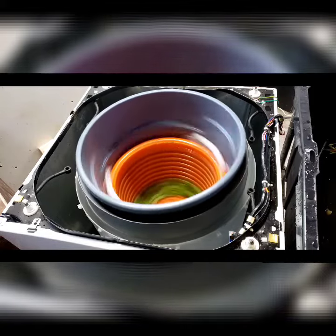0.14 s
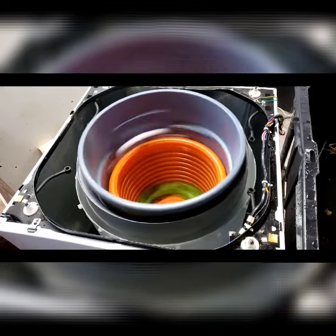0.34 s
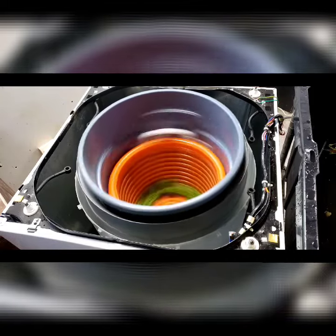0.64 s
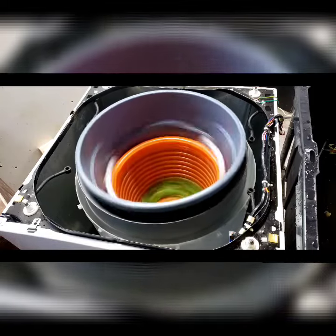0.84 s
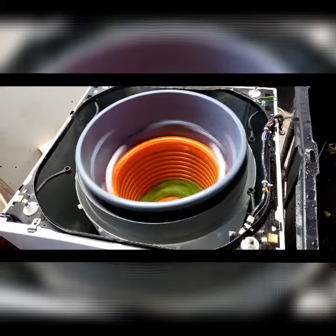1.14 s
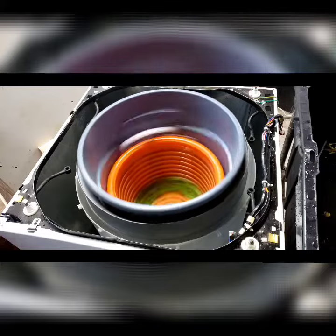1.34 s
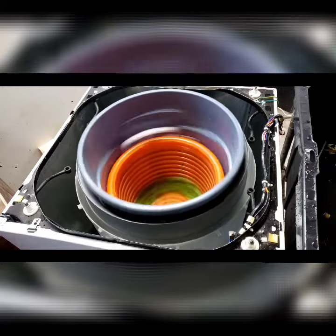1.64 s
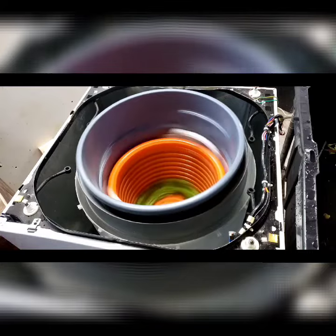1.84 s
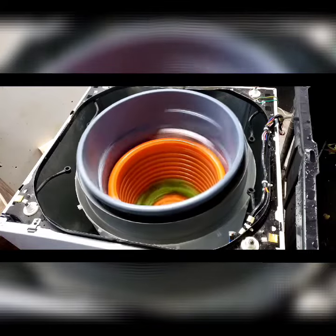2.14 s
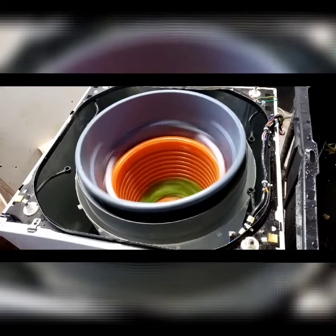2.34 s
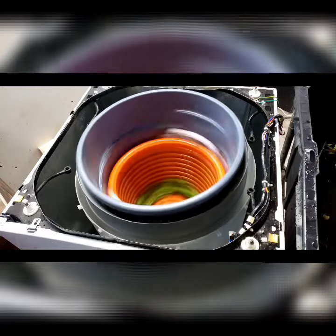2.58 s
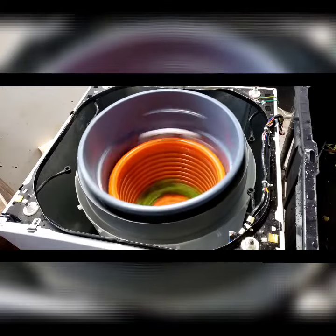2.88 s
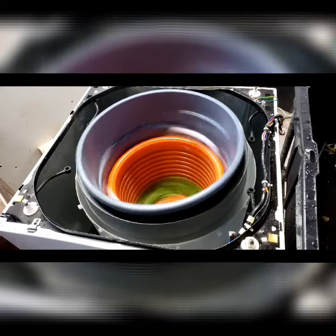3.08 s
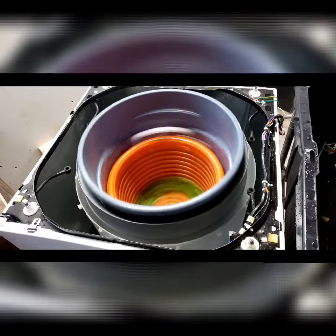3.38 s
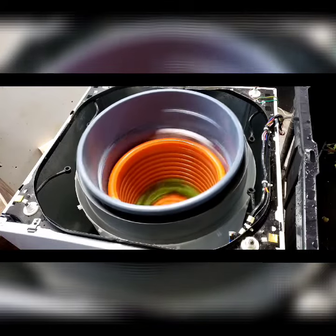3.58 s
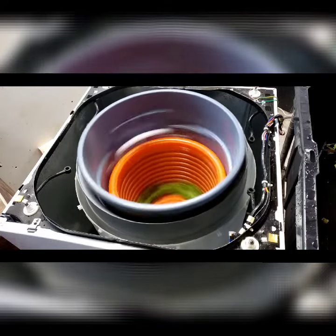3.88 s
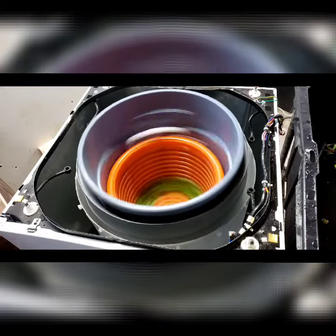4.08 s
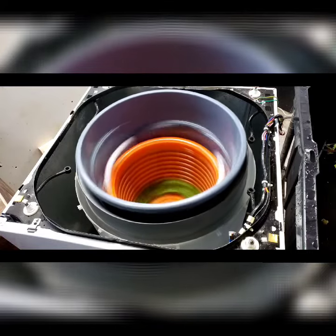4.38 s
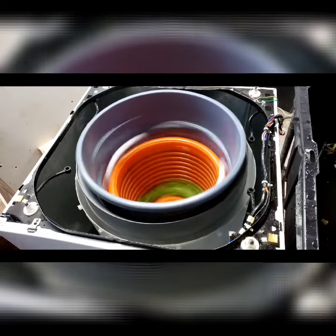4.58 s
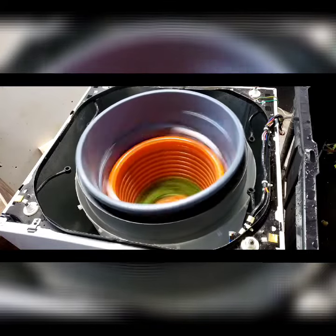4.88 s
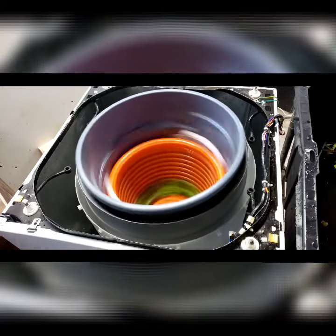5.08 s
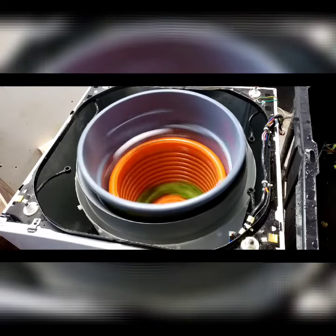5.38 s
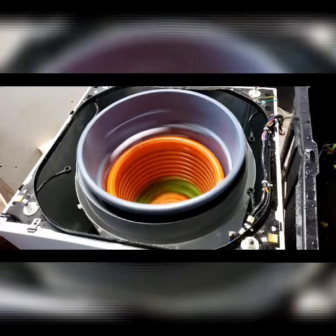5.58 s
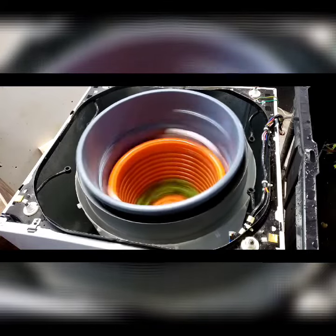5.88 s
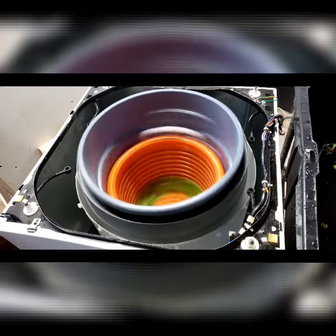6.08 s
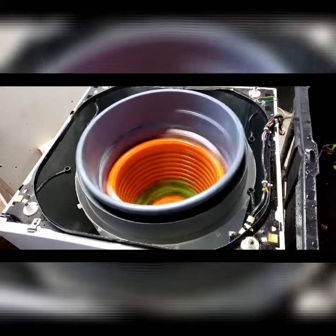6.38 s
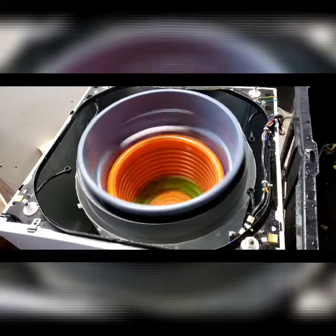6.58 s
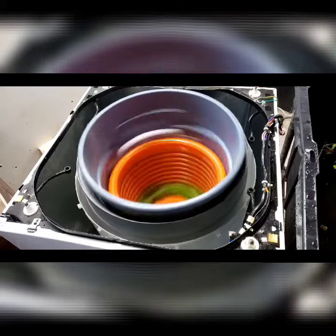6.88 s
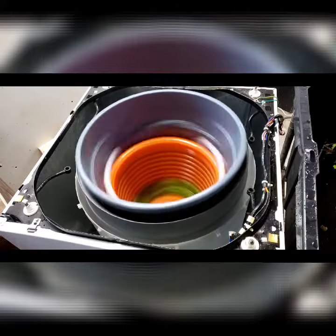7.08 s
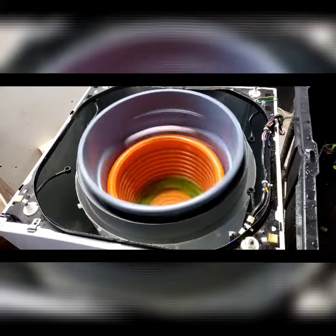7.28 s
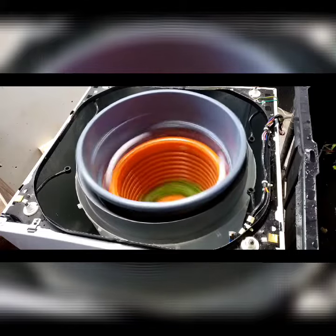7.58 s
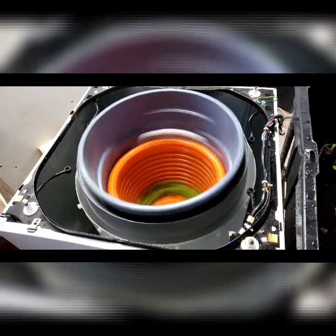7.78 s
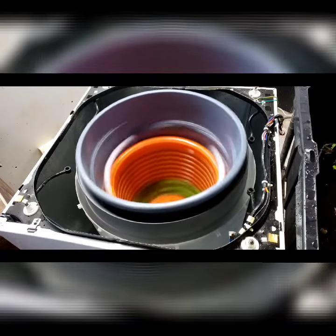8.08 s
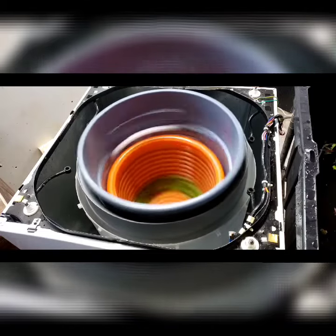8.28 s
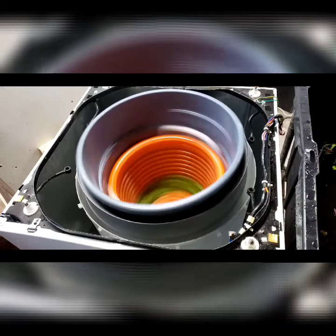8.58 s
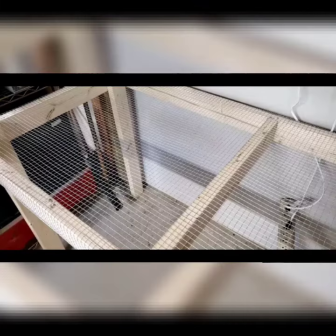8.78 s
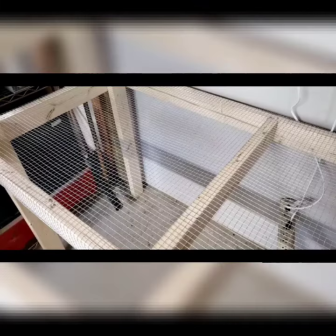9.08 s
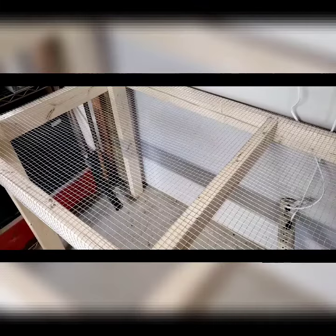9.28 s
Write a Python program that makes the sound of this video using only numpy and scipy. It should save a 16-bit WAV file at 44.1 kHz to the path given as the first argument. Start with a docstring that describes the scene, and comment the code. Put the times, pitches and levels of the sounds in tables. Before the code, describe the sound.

From 0 s a steel washer drum is already spinning fast in its open cabinet, very close to a phone microphone. A loud, low hum near 80 Hz dominates, fluttering several times a second and climbing smoothly, swelling as it passes through the cabinet's boom above 100 Hz. Beneath it, rough bearings rumble and rattle the panels in a partly repeating pattern; thin shaft tones swell and fade, and a whirr with rushing air fills the top, fullest around 2 s. At about 5.6 s the acceleration freshens. Dull, soft thumps strike from 5.9 to 6.4 s, with a falling-pitch knock and a momentary hum dip near 6.35 s, then another thump at 6.9 s. The pitch reaches roughly 130 Hz. At 8.78 s everything cuts off. After a tiny silence, quiet low room tone returns at 8.85 s with faint grainy rustles, a bright tick near 9.14 s, and dull taps around 9.37 s.

```python
"""A belt-driven steel washer drum spins up in its open cabinet, close to a phone microphone. Motor unbalance and
drum wobble sweep through the cabinet's boom, rough bearings rattle the panels with a pattern that partly repeats
each drum turn, shaft tones swell as they cross panel modes, and filtered noise makes the whirr and rushing air.
Dull thumps shake the panels. The sound cuts off; after a short silence come a quiet room with low noise,
grainy soft rustles, and a few ticks and taps made of damped rings."""
import sys
import numpy as np
from scipy import signal
from scipy.fft import rfft, irfft
from scipy.io import wavfile
from scipy.ndimage import uniform_filter1d, map_coordinates

SR = 44100
rng = np.random.default_rng(int(sys.argv[2]) if len(sys.argv) > 2 else 0)


def to_wav(sig):
    """Store sig (one row per channel, or 1-D mono) as 16-bit WAV at the path in sys.argv[1].

    Samples outside -1..1 are clipped; the rate is SR.
    """
    pcm = np.clip(np.atleast_2d(sig), -1, 1) * 32767
    pcm = np.round(pcm).astype(np.int16)
    wavfile.write(sys.argv[1], SR, pcm.T)  # frames by channels


N = 416304
T = np.arange(N) / SR
PULLEY_RATIO = 13.019  # motor turns per drum turn


def undb(db):
    """Amplitude gain of a level in dB."""
    return np.exp(np.asarray(db) * np.log(10) / 20)


def unit(x):
    """Signal scaled to rms 1."""
    return x / np.sqrt(np.mean(x ** 2))


def noise():
    """White noise over the whole scene."""
    return rng.standard_normal(N)


def curves(table):
    """Columns of a time table, drawn as straight lines between its rows."""
    s, *columns = np.transpose(table)
    return [np.interp(T, s, column) for column in columns]


def ring(x, hz, width_hz):
    """One resonance, gain 1 at its centre."""
    return signal.lfilter(*signal.iirpeak(hz, hz / width_hz, SR), x)


def walk(rate_hz):
    """Random levels, each held for 1 / rate_hz and smoothed twice; rms 1."""
    hold = int(SR / rate_hz)
    held = np.repeat(rng.standard_normal(N // hold + 1), hold)
    smooth = uniform_filter1d(uniform_filter1d(held, hold), hold)
    return unit(smooth[:N])


def hiss(spectrum, flicker_db, rate_hz):
    """Noise of a given spectrum in half-octave bands that flicker independently; rms 1."""
    table_hz, table_db = np.transpose(spectrum)
    f = np.maximum(np.arange(N // 2 + 1) * SR / N, 1)
    level_db = np.interp(np.log(f), np.log(table_hz), table_db, left=-90, right=-90)
    shaped = rfft(noise()) * undb(level_db)
    band = np.round(2 * np.log2(f))
    first, last = np.round(2 * np.log2(table_hz[[0, -1]]))
    out = np.zeros(N)
    for b in np.arange(first, last + 1):
        out += irfft(shaped * (band == b), N) * undb(flicker_db * walk(rate_hz))
    return unit(out)


def knocks(hits, modes, noisy):
    """Short damped rings, each a sine mixed with a noisy share."""
    t = T[:SR // 4]
    out = np.zeros(N + len(t))
    for s, hit_db in hits:
        start = int(s * SR)
        for hz, db, t60 in modes:
            rough = unit(ring(rng.standard_normal(len(t)), hz, hz / 2))
            body = (1 - noisy) * np.sin(2 * np.pi * hz * t) + noisy * rough / 2
            out[start:start + len(t)] += undb(hit_db + db) * body * undb(-60 * t / t60)
    return out[:N]


START_HZ = 80.543  # motor shaft speed at the start
# Drive stages, each adding speed that levels off: start_s, gain_hz, time_constant_s
DRIVE_STAGES = [(0, 37.743, 9.3406), (5.5733, 64.496, 8.0228)]
# Levels through the spin: time_s, rumble_db, air_db
SPIN_LEVELS = [(0, -42.5, -48), (.9, -43, -47), (2, -40, -43.5), (3.8, -41.5, -45.5), (5.9, -40.5, -46),
               (6.6, -42, -46.5), (7.5, -42, -48), (8.76, -40, -47.5)]


def washer():
    """The shaft spins up in stages; each part of the machine follows its speed, angle or level."""
    hz = START_HZ + sum(gain * (1 - np.exp(-np.maximum(T - s, 0) / tau)) for s, gain, tau in DRIVE_STAGES)
    turns = np.cumsum(hz) / SR
    rumble_db, air_db = curves(SPIN_LEVELS)
    load = np.cos(2 * np.pi * (turns / PULLEY_RATIO + 0.02))  # bearing load swings once a drum turn
    bearings = rumble(turns, rumble_db + 0.71 * load + 0.69 * walk(1.27))
    shaft_tones = undb(2.1 * load) * tones(hz, turns)
    return undb(0.3) * hum(hz, turns) + bearings + shaft_tones + whirr(hz, air_db) + air(air_db) + thumps()


# Motor unbalance swung by belt tension, force at a 100 Hz shaft: offset_drum_rates, force_db, lead_cycles
UNBALANCE_LINES = [(-2, -41.8, -.23), (-1, -38, -.34), (0, -19.2, .44), (1, -35.1, -.43), (2, -37.7, -.05),
                   (3, -47.9, .12), (6, -41.9, -.34)]
# Drum wobble, force at a 100 Hz shaft: drum_rate_multiple, force_db, lead_cycles
WOBBLE_LINES = [(11, -38.3, .29), (12, -32, .37), (14, -33.5, -.01), (15, -35.9, .42), (16, -39.5, -.2),
                (17, -44.3, .35), (18, -52.4, .38), (19, -44.5, .21), (21, -47, .1)]
# Low cabinet modes, negative gain where the panel swings the other way: pitch_hz, width_hz, gain
CABINET_MODES = [(110.8, 13.27, 1.23), (119.46, 10.73, -1.03), (96.37, 6.64, -.11), (133.5, 5.5, .5)]
# One brief dip in the hum: start_s, end_s, level_db
HUM_LEVEL_DIP = (6.364, 6.401, -16)


def hum(hz, turns):
    """Out-of-balance forces grow with speed and sweep through the low cabinet modes."""
    drum = turns / PULLEY_RATIO
    shaft = sum(undb(db) * np.cos(2 * np.pi * (turns + k * drum + lead)) for k, db, lead in UNBALANCE_LINES)
    wobble = sum(undb(db) * np.cos(2 * np.pi * (k * drum + lead)) for k, db, lead in WOBBLE_LINES)
    force = shaft * (hz / 100) ** 2 + wobble * (hz / 100) ** 3.5
    start, end, dip_db = HUM_LEVEL_DIP
    inside = (T > start) & (T < end)
    dip = uniform_filter1d(np.where(inside, undb(dip_db), 1.), 200)
    return dip * sum(gain * ring(force, f, width) for f, width, gain in CABINET_MODES)


# Panel modes rung by bearings and thumps, relative levels: pitch_hz, width_hz, level_db
PANEL_MODES = [(73, 55, -1), (144.3, 37, -0.5), (230.7, 31, -5), (250, 19.2, -6), (286.4, 28, -8),
               (369, 95, -5.5), (439.6, 22.3, -4), (502.4, 24, -6), (549, 42, -10), (729, 18.4, -16.5),
               (892, 56, -16.5)]


def rumble(turns, level_db, repeat=0.59, memory_turns=5.92):
    """Rough bearings ring the panels; a share of the roughness repeats round the drum and slowly changes."""
    drum, size = turns / PULLEY_RATIO, 8192
    patterns = rng.standard_normal((60, size))
    patterns = np.hstack([patterns, patterns[:, :1]])  # close each pattern into a loop
    age = drum / memory_turns  # one new pattern every memory_turns drum turns
    fade = np.sqrt((age % 1) ** 2 + (1 - age % 1) ** 2)  # evens the power of the crossfade
    pattern = map_coordinates(patterns, [age, drum % 1 * size], order=1) / fade
    force = np.sqrt(repeat) * pattern + np.sqrt(1 - repeat) * noise()
    rough = np.zeros(N)
    for k, (f, width, db) in enumerate(PANEL_MODES):
        gain = (-1) ** k * undb(db + 1.33 * walk(7)) / np.sqrt(width)
        rough += gain * ring(force, f, width)
    # the cabinet is too small for deep bass
    rough = signal.sosfilt(signal.butter(2, 62, "high", fs=SR, output="sos"), rough)
    return undb(level_db) * unit(rough)


# Motor and bearing tones, before the panel gain: shaft_rate_multiple, level_db
SHAFT_TONES = [(.534, -52.5), (1.61, -57), (2.36, -48), (2.6, -53), (3, -51), (3.38, -54), (4.4, -41.5),
               (5, -44), (5.35, -51), (6.05, -54)]
# Second shaft harmonic and drum sidebands, level at OVERTONE_HZ: shaft_rate_multiple, level_db
SHAFT_OVERTONES = [(1.923, -51), (2, -46), (2.077, -44.5)]
OVERTONE_HZ, OVERTONE_DB_PER_HZ = 113, 0.8  # overtones grow with shaft speed
# Sharp panel modes that bring the tones out: pitch_hz, width_hz, level_db
TONE_PANEL_MODES = [(60.5, 10, 0), (136, 14, -4), (228, 12, -1), (246, 9, -2.5), (287, 16, -4),
                    (328, 14, -5), (360, 9, -7), (412, 14, -8), (432, 18, -4), (448, 20, 0.5),
                    (490, 30, -14), (520, 24, -10), (735, 20, 0)]
TONE_WANDER_CYCLES = 0.045  # rms stray of a tone's phase


def panel_gain(hz):
    """Combined strength of the sharp panel modes at a changing pitch."""
    power = sum((undb(db) / (1 + (2 * (hz - mode) / width) ** 2)) ** 2 for mode, width, db in TONE_PANEL_MODES)
    return np.sqrt(power)


def tones(hz, turns):
    """Multiples of the shaft rate swell while they cross a panel mode."""
    def line(multiple, db):
        phase = multiple * turns + rng.random() + TONE_WANDER_CYCLES * walk(8)
        return undb(db + 1.9 * walk(9.5)) * panel_gain(multiple * hz) * np.cos(2 * np.pi * phase)

    plain = sum(line(k, db) for k, db in SHAFT_TONES)
    overtones = sum(line(k, db) for k, db in SHAFT_OVERTONES)
    return plain + undb(OVERTONE_DB_PER_HZ * (hz - OVERTONE_HZ)) * overtones


# Upper panel modes, relative level at the shaft speed that sings most: pitch_hz, width_hz, level_db, best_shaft_hz
WHIRR_MODES = [(729.3, 13, -8.5, 133), (1108, 50, -14, 67), (1296, 28, -14.5, 114), (1434, 20, -13.5, 95),
               (1737, 24, -13, 92), (2043, 44, -13.5, 92), (2448, 33, -17, 90), (2550, 23, -17.5, 73),
               (2636, 40, -13, 80), (2760, 32, -14, 78), (3057, 30, -18, 81), (3784, 32, -15.5, 96),
               (3875, 36, -17, 72), (4700, 70, -20, 120)]
WHIRR_DB, WHIRR_DB_PER_HZ = -2, 0.13  # offset from the air level; fall away from the best shaft speed


def whirr(hz, air_db):
    """Upper panel modes whirr along with the air, each strongest near its own shaft speed."""
    out = np.zeros(N)
    for f, width, db, best_hz in WHIRR_MODES:
        level_db = db - WHIRR_DB_PER_HZ * np.abs(hz - best_hz) + 2.27 * walk(6)
        out += undb(level_db) * unit(ring(noise(), f, width))
    return undb(air_db + WHIRR_DB + 1.0 * walk(2.78)) * out


# Spectrum of the air rush, relative density: pitch_hz, level_db_per_hz
AIR_SPECTRUM = [(350, -39), (600, -3.5), (723, -6), (957, -7.5), (1410, -7.5), (2240, -9), (2700, -10.5),
                (3350, -12.5), (3770, -9.5), (8740, -14), (11600, -10.5), (14500, -13)]
RIM_DB = -10  # rim hiss relative to the air level


def air(air_db):
    """Air rushing past the rim: flickering broad noise and a thin high hiss."""
    rush = undb(air_db + 0.29 * walk(4.6)) * hiss(AIR_SPECTRUM, flicker_db=0.91, rate_hz=27)
    rim = undb(air_db + RIM_DB) * unit(ring(noise(), 14900, 4000))
    return rush + rim


# Thumps on the cabinet; the rows from 6.339 to 6.42 s are the parts of one knock whose ring falls in pitch.
# push_db is before the panel gain; a ring sags by twice sag_per_s as a share of its pitch each second:
# start_s, push_db, ring_hz, ring_db, sag_per_s
CABINET_THUMPS = [(5.903, -49, 385, -33.5, .3), (6.028, -47, 385, -33, .3), (6.166, -51, 390, -36, .3),
                  (6.288, -54, 385, -38, .3), (6.339, -43, 620, -38, .5), (6.343, -54, 490, -34, 2.4),
                  (6.37, -52, 310, -33, 1.4), (6.42, -54, 255, -35, .3), (6.895, -48, 430, -42, .3)]
THUMP_S, RING_T60_S = 0.02, 0.2  # contact length; time for a ring to fall 60 dB


def thumps():
    """Soft, dull thumps of the drum shake the panels by short noisy pushes, with decaying rings on top."""
    push = sum(undb(db) * np.clip(1 - np.abs(2 * (T - s) / THUMP_S - 1), 0, 1) for s, db, *_ in CABINET_THUMPS)
    dull = signal.sosfilt(signal.butter(2, 750, fs=SR, output="sos"), noise())
    force = push * unit(dull)
    out = np.zeros(N)
    for k, (f, width, db) in enumerate(PANEL_MODES[2:]):
        # the panels ring twice as broadly here, with half the dB contrast
        out += undb(18.0) * (-1) ** k * undb(db / 2) * ring(force, f, 2 * width)
    t = T[:SR // 8]
    for s, _, hz, db, sag in CABINET_THUMPS:
        start = int(s * SR)
        shape = np.minimum(t / 0.0025, 1) * undb(db - 60 * t / RING_T60_S)
        out[start:start + len(t)] += shape * np.sin(2 * np.pi * hz * t * (1 - sag * t))
    return out


# Spectrum of the rubbed surface, relative density: pitch_hz, level_db_per_hz
RUSTLE_SPECTRUM = [(470, -36), (800, -14), (1430, -11), (1560, -12), (1740, -7.5), (2410, -11),
                   (3200, -11.5), (3920, -12), (6130, -11.5), (11000, -11), (14500, -11)]
# Rustles in the quiet room, low part relative to the rest: peak_s, level_db, rise_db_per_s, low_db
RUSTLE_SWELLS = [(8.887, -58.5, 299, -11.5), (9.0, -72, 899, -11.5), (9.114, -59.5, 600.5, -17),
                 (9.139, -48.5, 3000, -7), (9.262, -86, 900, -8), (9.335, -66.5, 500, 0),
                 (9.368, -65, 496, 5)]
FALL_DB_PER_S, RUSTLE_FLOOR_DB = 142, -86  # fade after each peak; constant faint rustle


def rustles():
    """Grainy rubbing noise swells and fades around each peak."""
    grain_db = 0.84 * np.repeat(rng.exponential(size=N // 64 + 1), 64)[:N]
    grain = uniform_filter1d(undb(grain_db), 64)
    rubbing = unit(grain * hiss(RUSTLE_SPECTRUM, flicker_db=1.5, rate_hz=37))
    # the rubbed surface rings in two broad bands
    lower = undb(-7.0 + 3.0 * walk(15)) * ring(rubbing, 1200, 350)
    upper = undb(-3 + 1.7 * walk(15)) * ring(rubbing, 3900, 410)
    rustle = rubbing + lower + upper
    low = unit(ring(ring(noise(), 470, 700), 450, 800))
    out = undb(RUSTLE_FLOOR_DB) * rustle
    for s, db, rise, low_db in RUSTLE_SWELLS:
        swell_db = np.where(T < s, rise * (T - s), FALL_DB_PER_S * (s - T))
        out += undb(db + swell_db) * (rustle + undb(low_db) * low)
    return out


# Bright ticks: start_s, level_db
TICK_HITS = [(9.0, -57), (9.113, -58), (9.136, -34.5), (9.144, -44), (9.149, -43), (9.259, -47)]
# What the ticks ring with, relative levels: pitch_hz, level_db, t60_s
TICK_RINGS = [(1580, 2, 0.014), (1400, -10, .07), (1900, -2, 0.0087), (4500, -8, .008), (600, -23, 0.011)]
# Dull taps: start_s, level_db
TAP_HITS = [(9.15, -50), (9.323, -53), (9.367, -41), (9.381, -49), (9.398, -50)]
# What the taps ring with, relative levels: pitch_hz, level_db, t60_s
TAP_RINGS = [(275, -3, 0.13), (460, -5, .04), (910, -2, 0.013)]


def ticks_and_taps():
    """Bright, mostly noisy ticks and duller, more tonal taps, each a set of damped rings."""
    return knocks(TICK_HITS, TICK_RINGS, noisy=0.64) + knocks(TAP_HITS, TAP_RINGS, noisy=0.3)


# Spectrum of the room tone, relative density: pitch_hz, level_db_per_hz
ROOM_SPECTRUM = [(15, -37), (25, -16), (70, -3), (189, -15), (256, -8), (293, -22), (448, -34), (600, -22),
                 (780, -50), (1320, -120)]
ROOM_DB = -69  # rms level


def room_tone():
    """Low background noise of the room, its bands slowly flickering."""
    return undb(ROOM_DB) * hiss(ROOM_SPECTRUM, flicker_db=2.5, rate_hz=8)


CUT_S, BACK_S = 8.7775, 8.852  # silence between these times


def scene():
    """The washer cuts off; after a gap the quiet room is heard."""
    washer_gate = np.clip((CUT_S - T) / 0.00116, 0, 1)
    room_gate = np.clip((T - BACK_S) / 0.0077, 0, 1) ** 2
    room = rustles() + ticks_and_taps() + room_tone()
    return (washer_gate * washer() + room_gate * room)[None]


TOP_HZ = 14680  # upper limit of the phone microphone


def record(dry):
    """The phone cuts the top with a steep low-pass."""
    return signal.sosfilt(signal.ellip(14, .2, 80, TOP_HZ, fs=SR, output="sos"), dry)


dry = scene()
out = record(dry)
to_wav(out)
```